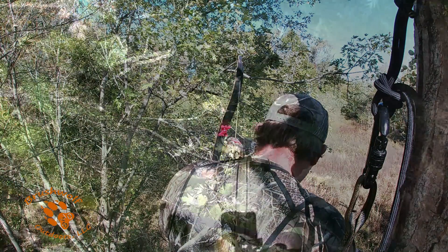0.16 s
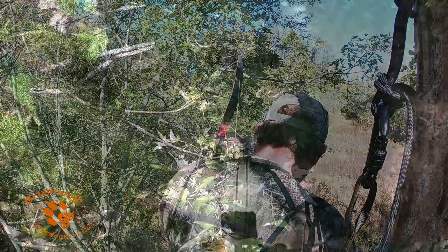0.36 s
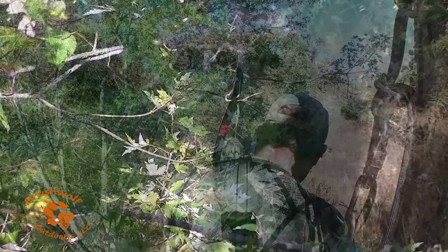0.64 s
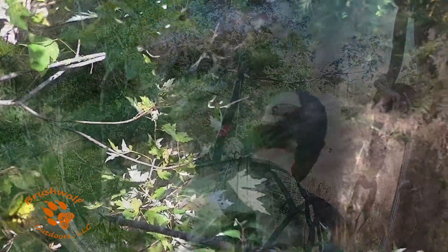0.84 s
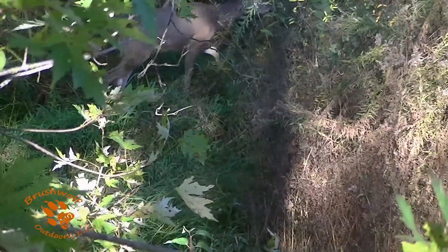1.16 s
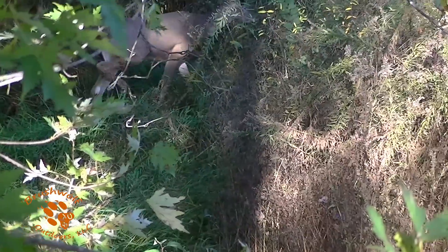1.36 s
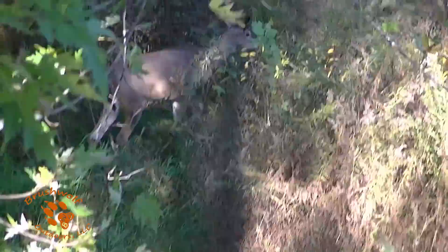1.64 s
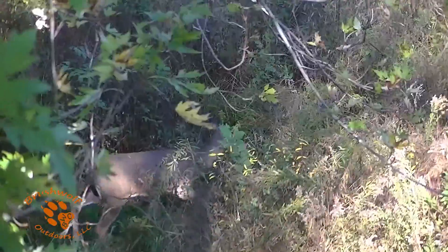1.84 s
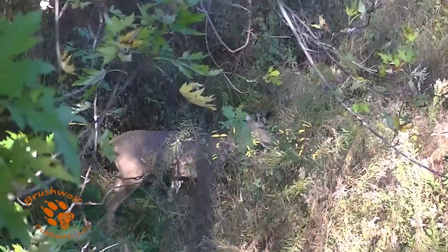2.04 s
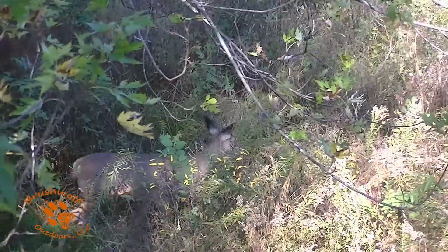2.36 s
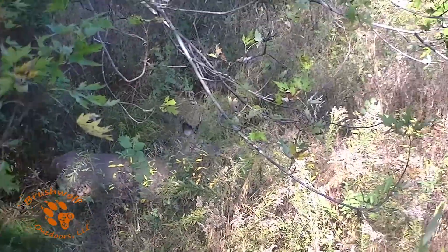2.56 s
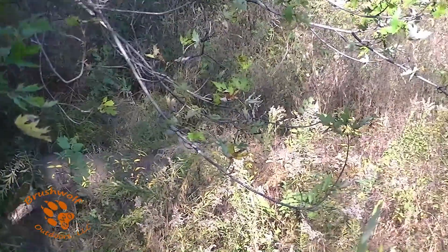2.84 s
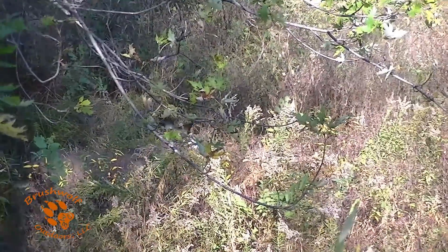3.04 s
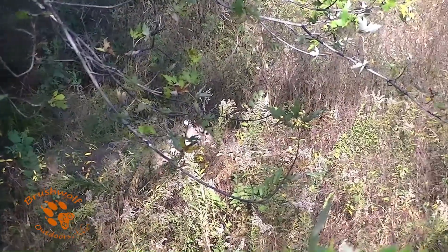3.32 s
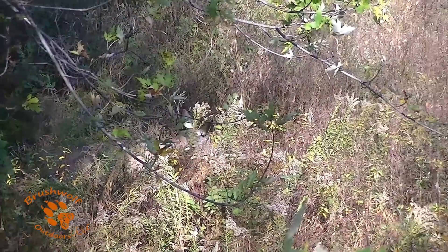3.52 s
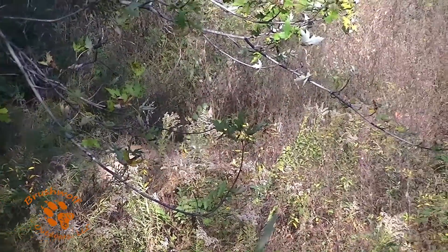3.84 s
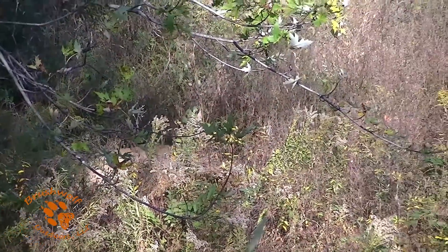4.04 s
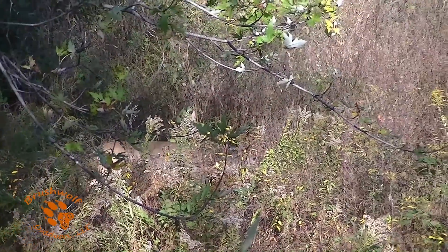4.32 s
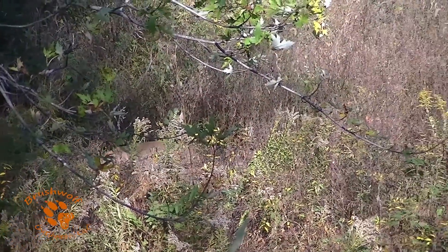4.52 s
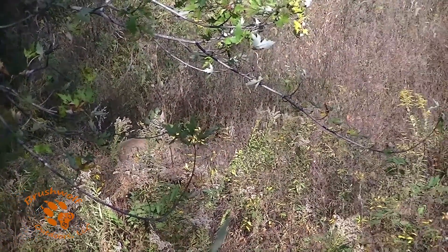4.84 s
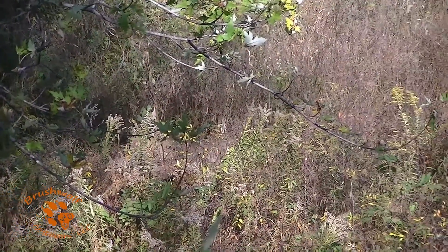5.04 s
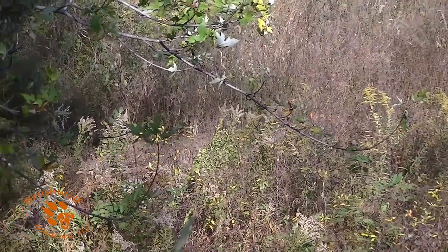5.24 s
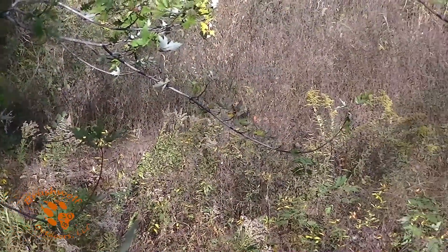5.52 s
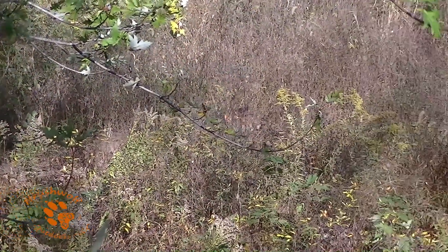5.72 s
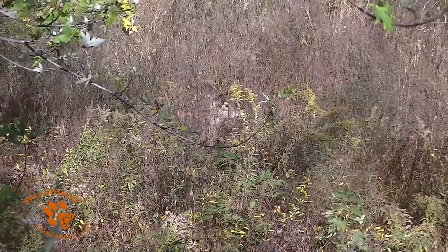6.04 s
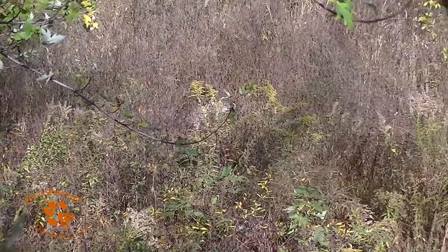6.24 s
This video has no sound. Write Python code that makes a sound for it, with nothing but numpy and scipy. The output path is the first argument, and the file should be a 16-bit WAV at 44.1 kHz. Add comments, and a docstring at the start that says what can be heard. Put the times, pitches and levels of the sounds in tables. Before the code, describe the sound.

A quiet wood's edge beside a dry field, heard by one camera microphone, identical left and right. Air and insect hiss swell in quickly, with a barely audible low hum fading at once. Dry twigs snap irregularly through the first 0.8 seconds as a deer walks. A jay gives harsh, nasal, falling calls of about 0.4 seconds at 0.1, 0.7, 1.3, 1.9, 2.6 and 4.0, each echoing among trunks and leaves. Stalks rustle softly at 1.6. A small bird chips high at 2.6, 5.1 and, faintly, 6.3; a distant note sounds at 3.8. Twigs crack around 2.9, loudest at 3.0, then 3.5, with a faint tick at 5.3. Cricket trills overlap from 0.8 onward among quick chirps; thin katydid buzzes come and go until 5.5. Very faint lens-motor ticking lasts until nearly 5. Soft knocks come at 5.1 and 6.2, then a rustle and a final sharp snap at 6.4.

```python
"""Jay calls at a wood's edge

A jay-like bird gives six harsh, falling calls: rough partials scattered by trunks and leaves.
A small bird chips three times, a far one sounds a note, and twigs snap as a deer walks through the brush.
Crickets trill and chirp in the dry field as arched tones; katydids buzz as bands of noise.
Under it all: a faint rush of air, an insect hiss, a brief hum and the ticking of a camera's lens motor."""
import sys
import numpy as np
from scipy import signal
from scipy.fft import rfft, irfft
from scipy.io import wavfile
from scipy.ndimage import map_coordinates

SR = 44100
rng = np.random.default_rng(int(sys.argv[2]) if len(sys.argv) > 2 else 0)


def store_pcm(level_fs):
    """Save levels as 16-bit WAV."""
    pcm = np.round(np.clip(level_fs, -1, 1) * 32767).astype(np.int16)
    wavfile.write(sys.argv[1], SR, np.atleast_2d(pcm).T)


N = 281358
T = np.arange(N) / SR


def undb(db):
    """Decibels to gain."""
    return 10 ** (np.asarray(db) / 20)


def unit(x):
    """Scale to rms 1."""
    return x / np.sqrt(np.mean(x ** 2) + 1e-20)


def add(out, start_s, x):
    """Mix x into out from start_s on."""
    i = max(int(start_s * SR), 0)
    out[i:i + len(x)] += x[:max(len(out) - i, 0)]


def colour(x, points):
    """Filter by a spectrum of (f/Hz, level/dB) points, joined on a log frequency axis."""
    hz, db = np.transpose(points)
    f = np.fft.rfftfreq(len(x), 1 / SR) + 1e-3
    gain = undb(np.interp(np.log(f), np.log(hz), db))
    return irfft(rfft(x) * gain, len(x))


def band(size, hz, width_hz):
    """Noise in one bell-shaped band, rms 1."""
    f = np.fft.rfftfreq(size, 1 / SR)
    bell = np.exp(-2 * ((f - hz) / width_hz) ** 2)
    return unit(irfft(rfft(rng.standard_normal(size)) * bell, size))


def walk(size, rate_hz):
    """Smooth random curve, spread about 1, from rate_hz random points a second."""
    steps = np.arange(size) * rate_hz / SR
    return map_coordinates(rng.standard_normal(8192), [steps], order=2, mode="wrap")


def gate(t, start, end, rise, fall):
    """A window with sloping edges."""
    return np.clip((t - start) / rise, 0, 1) * np.clip((end - t) / fall, 0, 1)


def swell(depth_db, time_constant_s):
    """Level in dB that starts depth_db low and settles at 0."""
    return -depth_db * np.exp(-T / time_constant_s)


def woods(x, early_db, late_db, early_t60_s=0.18, late_t60_s=1.15):
    """Near trunks return a quick spray of echoes; the deeper wood adds a long, duller tail."""
    t = T[:int(1.5 * SR)]
    trunks = rng.standard_normal(len(t)) * (rng.random(len(t)) < .05)
    early = unit(trunks * undb(-60 * t / early_t60_s) * (t > .004))
    tail_points = [(300, -14), (1500, 5), (3300, -1), (5000, 2.5), (9000, -12.5)]
    leaves = colour(rng.standard_normal(len(t)), tail_points)
    late = unit(leaves * undb(-60 * t / late_t60_s) * np.minimum(t / 0.022, 1))
    echoes = (undb(early_db) * early + undb(late_db) * late) / np.sqrt(len(t))
    return x + signal.fftconvolve(x, echoes)[:N]


# jay calls: t/s, length/s, nominal crest f/Hz, dry level/dB, loudest point/share of length,
# level change in the catch/dB, outer partials/dB, inner partials/dB, harshness/0-1
JAY_CALLS = [(0.141, 0.38, 835.5, -36, 0.11, 1.5, 0, 0.5, 0.61),
             (0.69, .355, 832.6, -34.5, .48, -5.5, 0, -2, 0.64),
             (1.267, 0.37, 836.5, -37, 0.42, 0.5, 2, 1.5, 0.85),
             (1.904, 0.38, 835, -36.5, 0.5, -4, 1, 0, .6),
             (2.638, .41, 828.4, -38, .62, 1, -0.5, -1.5, 0.48),
             (4.017, 0.37, 818.2, -39.5, 0.36, 0.5, -3.5, 2.5, 0.54)]
# jay partials, 4th on the throat resonance: multiple of f, nominal level/dB
JAY_PARTIALS = [(2, -22), (3, -17), (4, 0.5), (5, -13), (6, -16), (7, -29.5), (8, -16.5), (9, -23),
                (10, -22)]
# single reflections off the ground and big trunks: delay/s, level/dB
JAY_REFLECTIONS = [(.031, -13.5), (0.05, -8.5), (.066, -12.5)]
# pitch: scoop from below, crest, sag, then a drop as the pressure runs out
SCOOP_SHARE, SCOOP_S, DROP_SHARE, DROP_S = .28, .014, 0.0695, 0.0229
CREST_S, CREST_WIDTH_S, SAG_HZ_PER_S = .075, .04, 290
# level: attack, brief catch, arch about the loudest point, release
CALL_ATTACK_S, CALL_RELEASE_S, CATCH_S, CATCH_LENGTH_S = 0.029, 0.03, .055, 0.019
CALL_ARCH_DB_PER_SHARE2 = 7.5


def jay():
    """Each call scoops up, crests and sags; syrinx flutter smears the partials at onset and late on."""
    out = np.zeros(N)
    for (start_s, length_s, top_hz, level_db, loudest, catch_db,
         outer_db, inner_db, harsh) in JAY_CALLS:
        t = T[:int(length_s * SR)]
        u, n = t / length_s, len(t)
        catch = np.exp(-((t - CATCH_S) / CATCH_LENGTH_S) ** 2)
        arch_db = -CALL_ARCH_DB_PER_SHARE2 * (u - loudest) ** 2
        effort = undb(level_db + arch_db + catch_db * catch)
        effort *= gate(t, 0, length_s, CALL_ATTACK_S, CALL_RELEASE_S)

        rough = harsh * (0.11 + 1.04 * u ** 3.32 + 0.62 * np.exp(-t / 0.025))
        scoop = 1 - SCOOP_SHARE * np.exp(-(t / SCOOP_S) ** 2)
        drop = 1 - DROP_SHARE * np.exp((t - length_s) / DROP_S)
        sag_hz = SAG_HZ_PER_S * (np.hypot(t - CREST_S, CREST_WIDTH_S) - CREST_WIDTH_S)
        flutter = .048 * rough * walk(n, 500) + .003 * walk(n, 110)
        hz = (top_hz - sag_hz) * scoop * drop * (1 + flutter)
        phase = 2 * np.pi * np.cumsum(hz) / SR

        # the tone brightens as the beak opens
        closed_db = -10 * np.exp(-t / .03)
        offsets_db = [0, inner_db + closed_db / 2, outer_db + closed_db]  # by distance from the 4th
        voice = np.zeros(n)
        for k, db in JAY_PARTIALS:
            offset_db = offsets_db[min(abs(k - 4), 2)]
            wander_db = (2.0 if k == 4 else 3.83) * walk(n, 70.45)
            voice += undb(db + offset_db + wander_db) * np.sin(k * phase)
        # alternate cycles differ: weak lines between the partials
        alternation = 0.49 * rough * np.sin(phase / 2) * walk(n, 42.7)
        voice *= 1 + alternation + 0.19 * rough * walk(n, 900)

        rasp_bands = band(n, 3880, 1770) + .5 * band(n, 7420, 1900)
        rasp = rough * undb(-4.5 + outer_db / 2) * rasp_bands
        throat = undb(-5.5) * rough * band(n, 3080, 550)
        add(out, start_s, (unit(voice) + rasp + throat) * effort)
    heard = out.copy()
    for delay_s, db in JAY_REFLECTIONS:
        add(heard, delay_s, undb(db) * out)
    return woods(heard, early_db=-9.0, late_db=-12, early_t60_s=0.26, late_t60_s=1.4)


# small bird's chips: t/s, length/s, nominal top f/Hz, dry level/dB
CHIPS = [(2.574, .04, 6050, -38), (5.069, .036, 6100, -41.5), (6.262, 0.045, 5700, -52)]
# far-off bird note: t/s, length/s, starting f/Hz, dry level/dB
FAR_NOTES = [(3.763, 0.057, 1630, -55.5)]


def small_birds():
    """Chips are quick arches of a near-pure whistle; the far note slips slightly down, mostly echo."""
    near, far = np.zeros(N), np.zeros(N)
    for start_s, length_s, top_hz, db in CHIPS:
        u = np.arange(int(length_s * SR)) / (length_s * SR)
        hz = top_hz * (1 - 1.2 * (u - .4) ** 2 + .018 * walk(len(u), 900))
        whistle = np.sin(2 * np.pi * np.cumsum(hz) / SR)
        add(near, start_s, undb(db) * whistle * gate(u, 0, 1, 0.52, .15))
    for start_s, length_s, hz, db in FAR_NOTES:
        t = T[:int(length_s * SR)]
        note = np.sin(2 * np.pi * hz * t * (1 - 0.38 * t))
        add(far, start_s, undb(db) * note * gate(t, 0, length_s, 0.013, 0.025))
    near = woods(near, early_db=-3.0, late_db=-13.0, early_t60_s=0.45)
    return near + woods(far, early_db=3, late_db=-21)


CRACK_LEAD = 64  # samples kept ahead of the break


def crack(db, t60_s, body, treble_db=0):
    """A break: fibres tear for a few ms, a short ring follows; db is the rms of its first 4 ms."""
    t = T[:8192] - 256 / SR
    tearing = np.exp(-(t / 0.0013) ** 2)
    fade = np.clip(t / 0.00043, 0, 1) * (undb(-60 * abs(t) / t60_s) + tearing)
    burst = colour(rng.standard_normal(len(t)) * fade, body)
    burst = colour(burst, [(2000, 0), (5000, treble_db)])
    return undb(db) * burst[256 - CRACK_LEAD:] / np.std(burst[(t > 0) & (t < .004)])


# snapping twigs: t/s, dry level/dB, treble/dB, ring t60/s
SNAPS = [(.0035, -41, -4.5, 0.041), (.1015, -36, -4.5, 0.043), (.195, -34.5, -2, 0.037),
         (0.3302, -30.5, -1, 0.039), (.437, -44, -7, 0.034), (.478, -32, -6.5, 0.033),
         (.587, -46, -10, .03), (.709, -43, -5, .03), (.789, -38.5, 0, 0.027), (2.917, -36.5, -3, 0.044),
         (3.023, -25, 1.5, 0.029), (3.507, -41, -32, 0.012), (3.523, -34, 3, 0.025),
         (5.268, -45.5, -18, 0.02), (6.274, -48.5, -6, .03), (6.369, -27.5, -1.5, 0.037)]
# twig body: f/Hz, level/dB
TWIG_BODY = [(100, -27), (220, -15.5), (450, -7.5), (800, -4.5), (1200, -11.5), (1750, -0.5), (2800, 0),
             (4400, 1), (6000, -5.5), (7500, -5), (11000, -22.5), (16000, -32)]
# soft close knocks: t/s, dry level/dB, treble/dB, t60/s
KNOCKS = [(5.066, -44.5, 5, 0.011), (6.217, -45.5, -6, .022)]
# knock body: f/Hz, level/dB
KNOCK_BODY = [(35, -18), (90, -8), (220, 4), (600, -2), (1500, -6), (4000, -8), (10000, -37)]
# rubbing dry plants: t/s, length/s, dry level before edge fades/dB
RUSTLES = [(1.609, 0.13, -50), (2.99, 0.065, -55), (6.221, 0.092, -57)]
# colour of the rubbing: f/Hz, level/dB
RUSTLE_COLOUR = [(60, -35), (110, -23), (200, -6), (400, -9), (650, -9), (880, 4.5), (1200, -10.5),
                 (1900, -4), (2600, -13), (5000, -37)]


def brush():
    """Twigs snap, dry stalks rub as grainy noise, and something knocks softly close by."""
    out = np.zeros(N)
    for cracks, body in [(SNAPS, TWIG_BODY), (KNOCKS, KNOCK_BODY)]:
        for start_s, db, treble_db, t60_s in cracks:
            add(out, start_s - CRACK_LEAD / SR, crack(db, t60_s, body, treble_db))
    for start_s, length_s, db in RUSTLES:
        t = T[:int(length_s * SR)]
        grains = rng.standard_normal(len(t)) * undb(2.9 * walk(len(t), 292))
        rubbing = unit(colour(grains, RUSTLE_COLOUR))
        add(out, start_s, undb(db) * rubbing * gate(t, 0, length_s, 0.033, 0.015))
    return woods(out, early_db=-10.5, late_db=-31)


# trilling ground crickets: start/s, end/s, nominal f/Hz, pulse rate/Hz, mean dry level/dB
TRILLS = [(.8, 2.403, 7480, 28, -51), (2.135, 4.1, 7640, 27.56, -48.5), (3.85, 5.35, 7400, 27.4, -53),
          (5.108, 6.612, 7900, 27, -57)]
# chirping crickets: first chirp t/s, period/s, length/s, nominal f/Hz, settled mean dry level/dB
CHIRPERS = [(.059, .1825, .036, 6510, -50.5), (0.09, .205, 0.073, 6080, -61),
            (0.039, .26, 0.041, 5300, -61), (.16, .3, 0.049, 5650, -63)]
# trill stroke: sounding share of cycle, pitch-top share of stroke, bend per share squared
STROKE_SHARE, STROKE_TOP, STROKE_BEND = .58, .3, .13
CHIRP_SWELL_DB, CHIRP_SWELL_S = 12, 2.2


def crickets():
    """Wing strokes ring tones: trills run arched strokes together, chirps space out falling ones."""
    out = np.zeros(N)
    for start_s, end_s, hz, rate_hz, db in TRILLS:
        cycle = ((T - start_s) * rate_hz + .05 * walk(N, 5)) % 1
        stroke = cycle / STROKE_SHARE
        bend = STROKE_BEND * (stroke - STROKE_TOP) ** 2
        pitch_hz = hz * (1.015 - bend + .008 * walk(N, 700))
        song = np.sin(2 * np.pi * np.cumsum(pitch_hz) / SR) * gate(stroke, 0, 1, .25, .25)
        out += undb(db + walk(N, 12)) * song * gate(T, start_s, end_s, 0.39, 0.26)
    for first_s, period_s, length_s, hz, db in CHIRPERS:
        since_s = (T - first_s + 0.0034 * walk(N, 3)) % period_s
        pitch_hz = hz * (1.007 - .014 * since_s / length_s + .005 * walk(N, 500))
        song = np.sin(2 * np.pi * np.cumsum(pitch_hz) / SR) * gate(since_s, 0, length_s, .009, 0.0087)
        out += undb(db + swell(CHIRP_SWELL_DB, CHIRP_SWELL_S) + walk(N, 3)) * song
    return woods(out * gate(T, 0, np.inf, .6, 1), early_db=-13, late_db=-18)


# buzzing katydids: start/s, end/s, centre f/Hz, width/Hz, mean level/dB
BUZZES = [(.55, 1.1, 11500, 3700, -58), (2.5, 3.151, 11200, 3700, -56), (3.96, 5.0, 11200, 3700, -54.5),
          (4.5, 5.5, 10400, 330, -60), (5.098, 5.5, 10500, 1600, -56.5)]


def katydids():
    """Fast file strokes blur into a thin, high buzz: noise bands of unsteady level."""
    out = np.zeros(N)
    for start_s, end_s, hz, width_hz, db in BUZZES:
        buzz = undb(db + 2 * walk(N, 90)) * band(N, hz, width_hz)
        out += buzz * gate(T, start_s, end_s, 0.23, 0.046)
    return out


# air rush: f/Hz, relative level/dB
AIR_COLOUR = [(18, -70), (30, -34), (126, -6.5), (284, -3), (506, -1.5), (614, 0.5), (669, -2), (942, -0.5),
              (1170, -3), (1870, -2.5), (2410, -4), (3120, -2), (5000, -5.5), (6500, -36), (11000, -120)]
# far insects: f/Hz, relative level/dB
CHORUS_COLOUR = [(2760, -37), (4700, -22), (5020, -18.5), (5440, -7), (6050, -4), (6270, -5), (6800, -3.5),
                 (7680, -0.5), (8290, -4.5), (10300, -8.5), (11500, -6), (13200, -8), (15300, -16.5),
                 (15800, -21)]
# settled levels; both swell in at the start
AIR_DB, AIR_SWELL_DB, AIR_SWELL_S = -57, 9.5, 0.14
CHORUS_DB, CHORUS_SWELL_DB, CHORUS_SWELL_S = -49, 9, 0.28
HUM_HZ, HUM_WIDTH_HZ, HUM_START_DB, HUM_FADE_DB_PER_S = 178, 30, -68, 36


def field():
    """Far insects merge into a shimmering hiss over a low rush of air and a fading hum."""
    air_db = AIR_DB + swell(AIR_SWELL_DB, AIR_SWELL_S) + .6 * walk(N, 10)
    air = unit(colour(rng.standard_normal(N), AIR_COLOUR)) * undb(air_db)
    chorus_db = CHORUS_DB + swell(CHORUS_SWELL_DB, CHORUS_SWELL_S) + 0.49 * walk(N, 50)
    chorus = unit(colour(rng.standard_normal(N), CHORUS_COLOUR)) * undb(chorus_db)
    hum = band(N, HUM_HZ, HUM_WIDTH_HZ) * undb(HUM_START_DB - HUM_FADE_DB_PER_S * T)
    return air + chorus + hum


MOTOR_RATE_HZ, MOTOR_HZ, MOTOR_WIDTH_HZ, MOTOR_DB = 30, 940, 250, -66.5
MOTOR_START_S, MOTOR_END_S, MOTOR_RISE_S, MOTOR_FALL_S = 0.02, 4.95, 1.7, .4


def lens_motor():
    """Steps of the zooming lens motor tick through the camera body: decaying bursts of band noise."""
    since_s = T * MOTOR_RATE_HZ % 1 / MOTOR_RATE_HZ
    body = band(N, MOTOR_HZ, MOTOR_WIDTH_HZ) + .5 * band(N, 540, 370)
    ticks = unit(np.exp(-since_s / 0.0038) * body)
    return ticks * undb(MOTOR_DB) * gate(T, MOTOR_START_S, MOTOR_END_S, MOTOR_RISE_S, MOTOR_FALL_S)


def scene():
    """All sources reach one microphone, the same left and right."""
    animals = jay() + small_birds() + brush() + crickets() + katydids()
    return np.tile(animals + field() + lens_motor(), (2, 1))


TOP_HZ = 15750


def record(dry):
    """The camera cuts the top: a steep elliptic low-pass."""
    return signal.sosfilt(signal.ellip(10, .2, 70, TOP_HZ, fs=SR, output="sos"), dry)


dry = scene()
out = record(dry)
store_pcm(out)
```